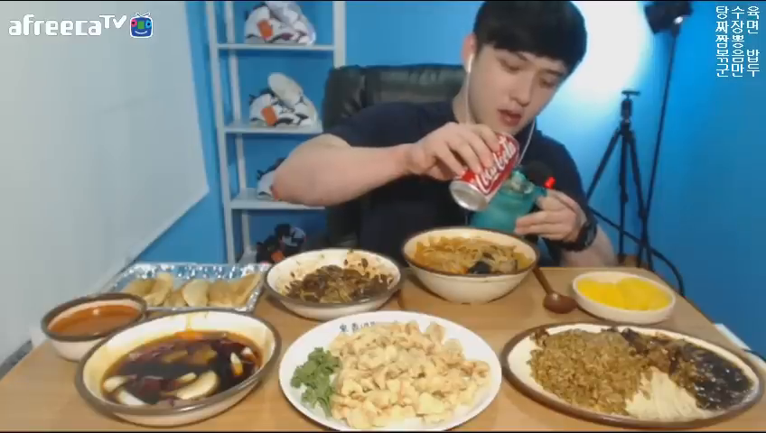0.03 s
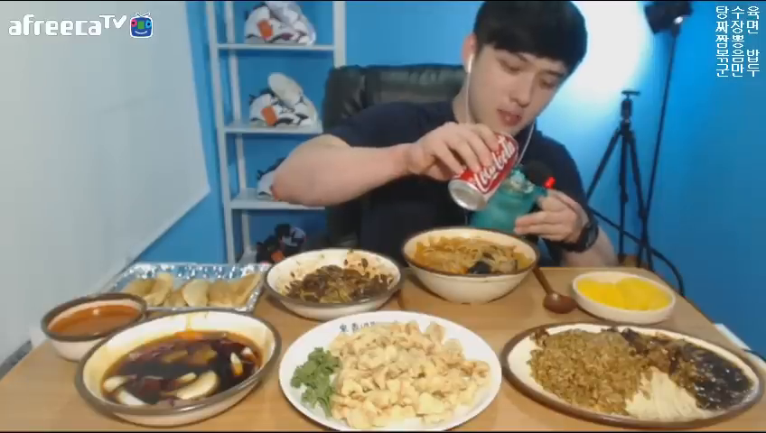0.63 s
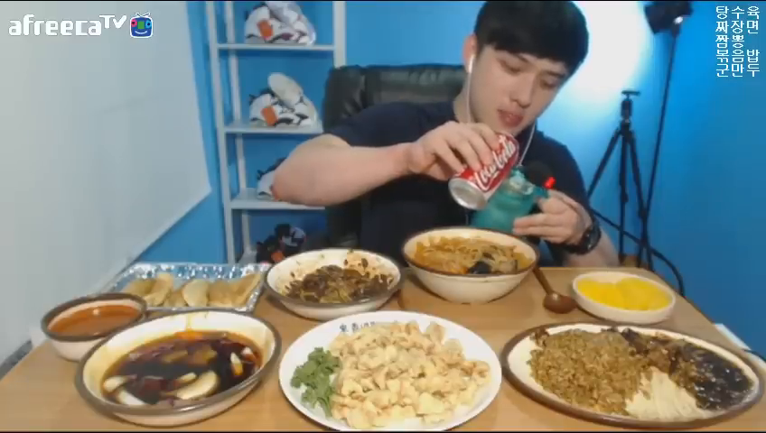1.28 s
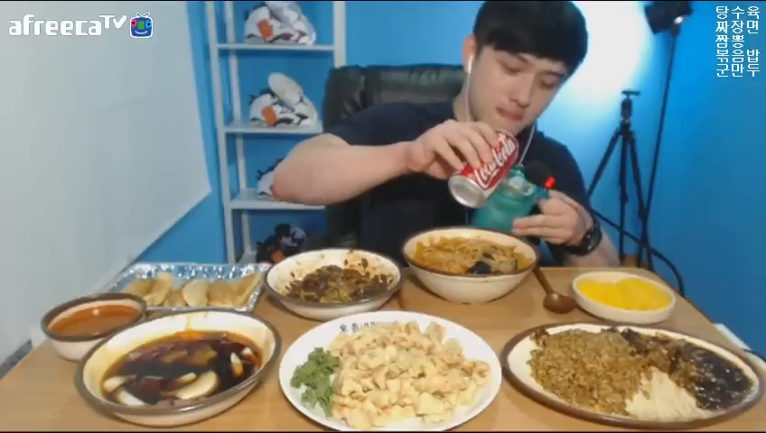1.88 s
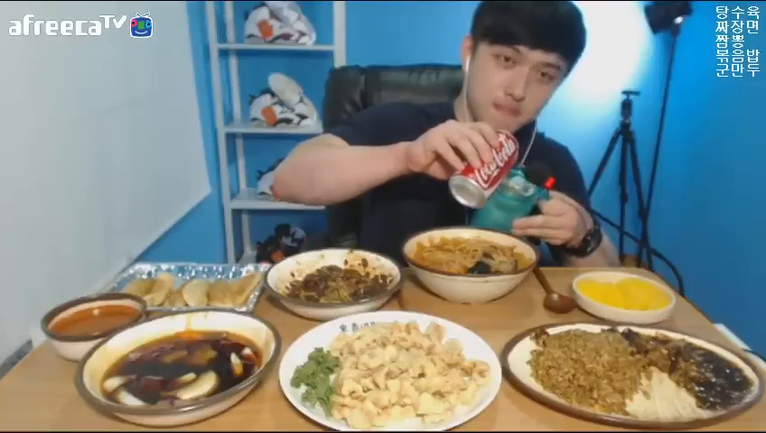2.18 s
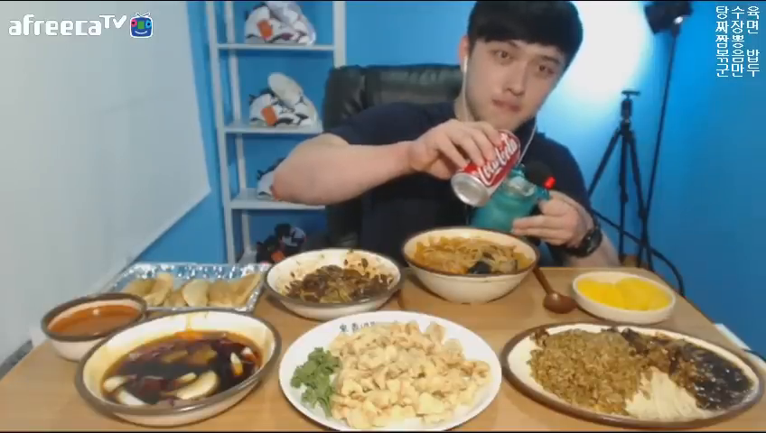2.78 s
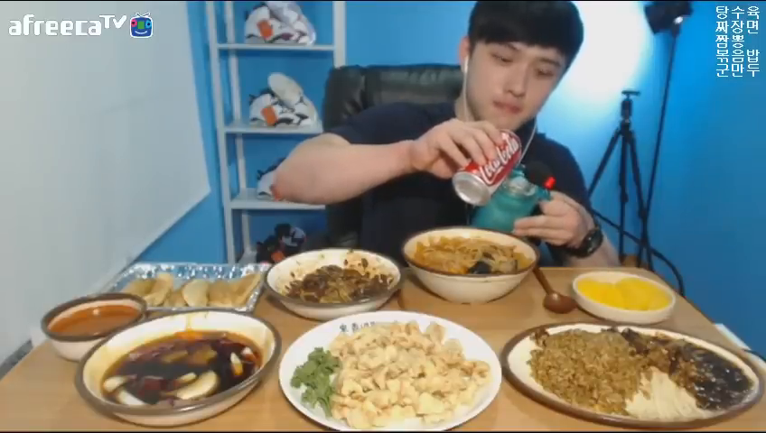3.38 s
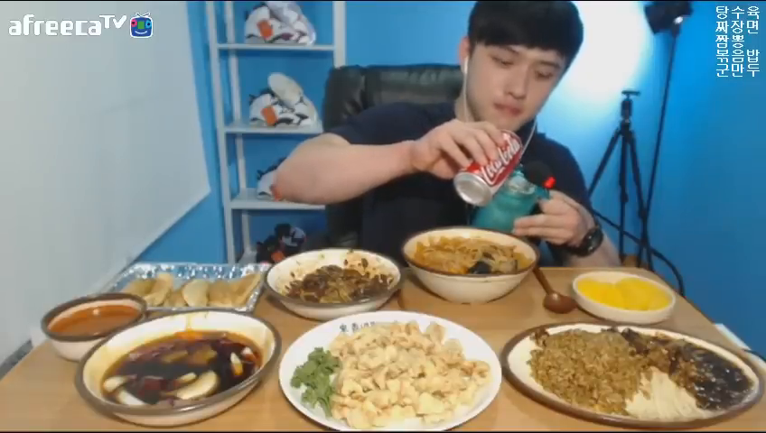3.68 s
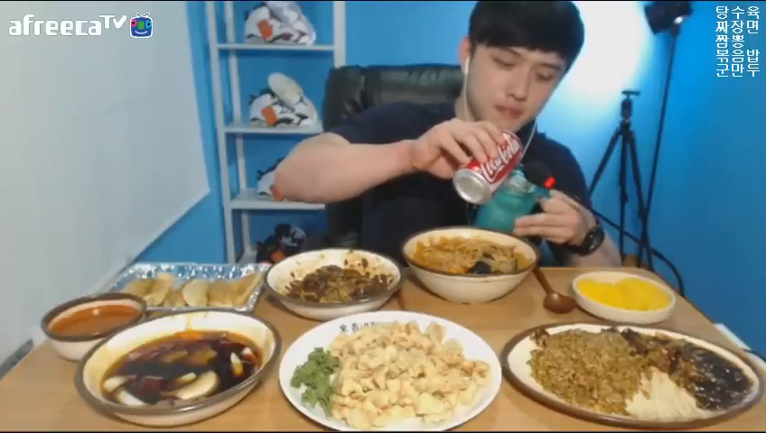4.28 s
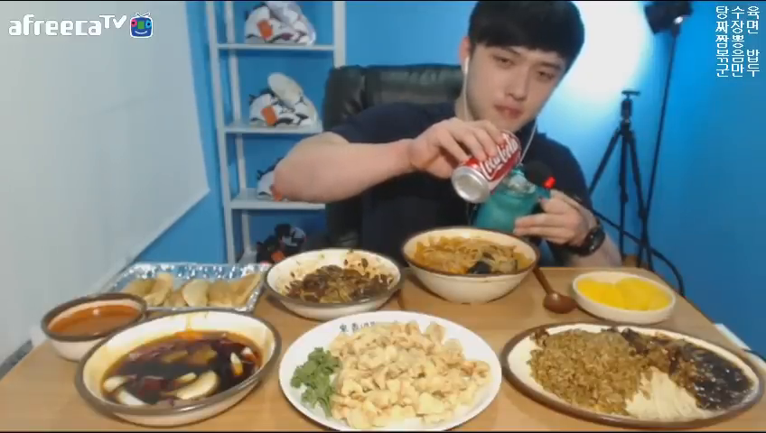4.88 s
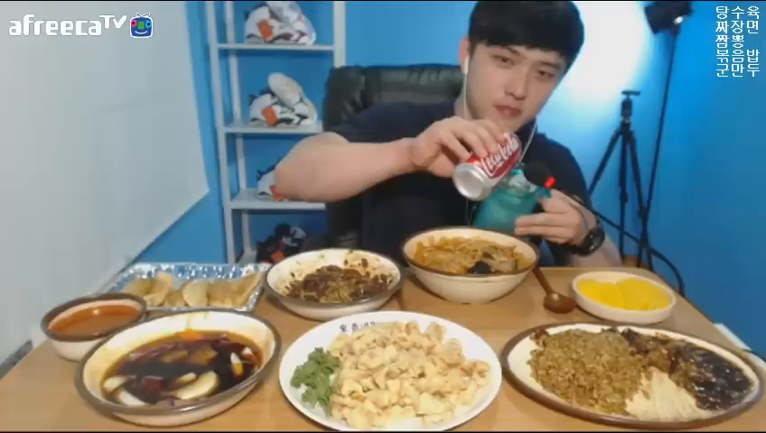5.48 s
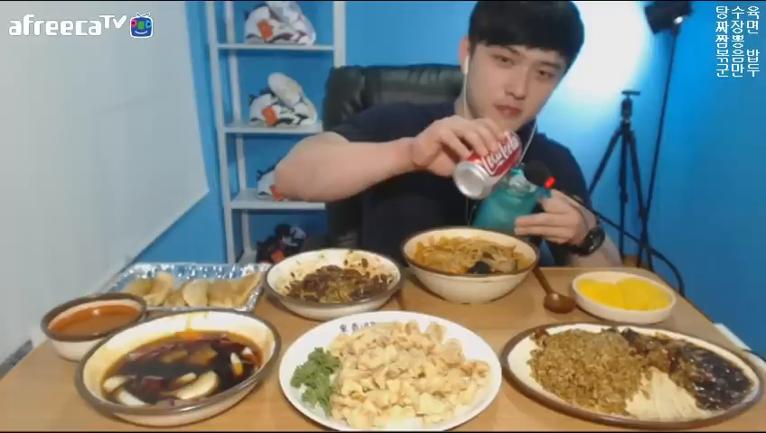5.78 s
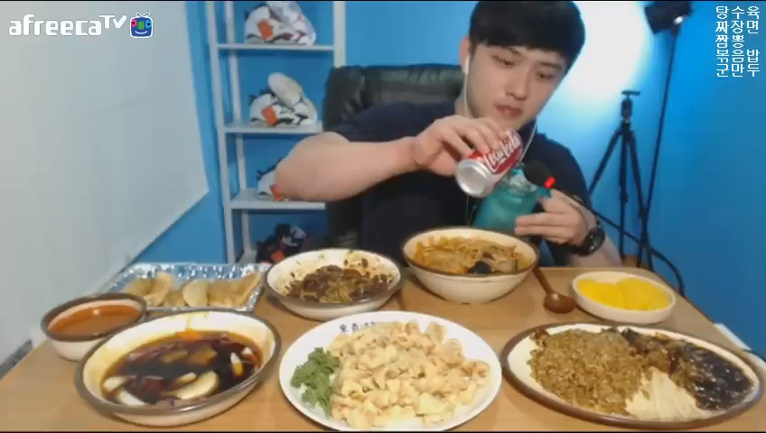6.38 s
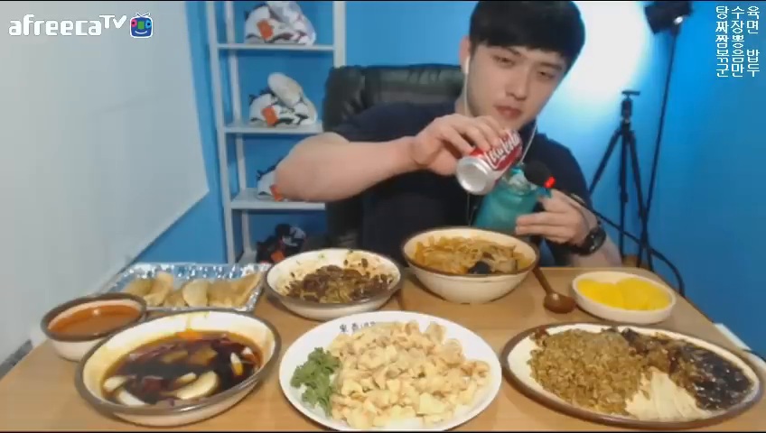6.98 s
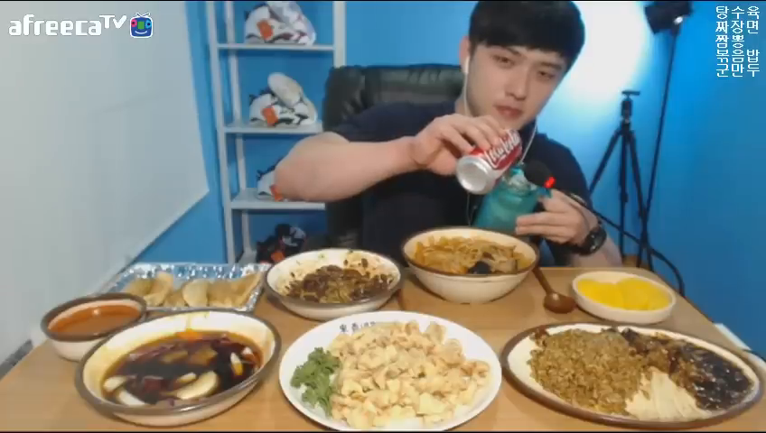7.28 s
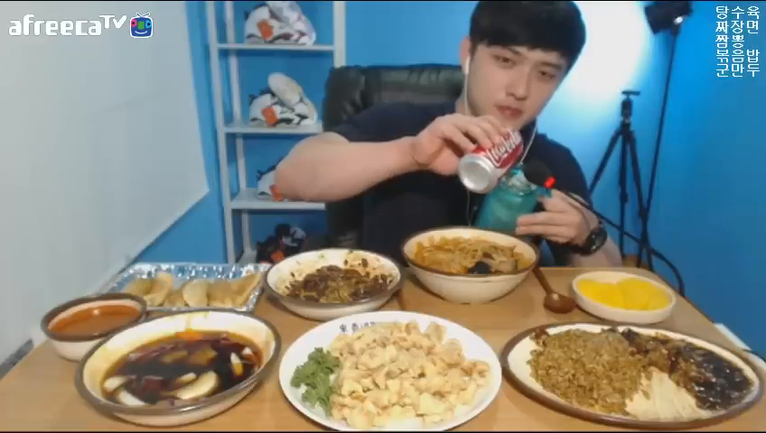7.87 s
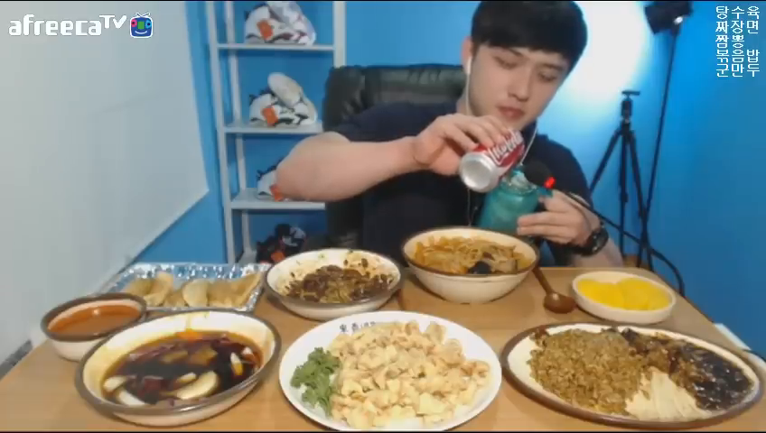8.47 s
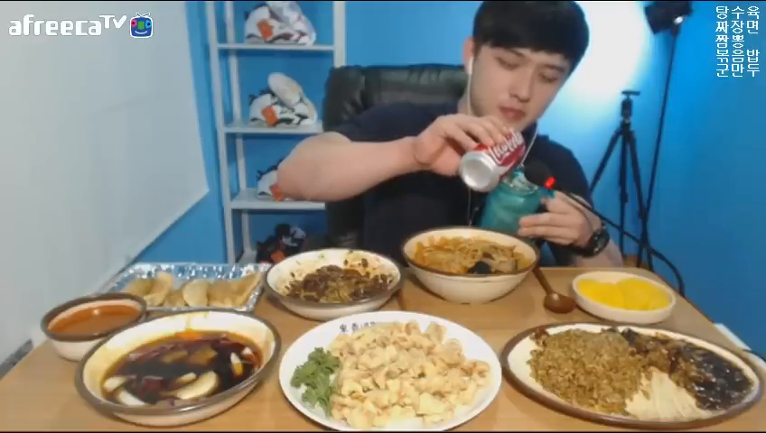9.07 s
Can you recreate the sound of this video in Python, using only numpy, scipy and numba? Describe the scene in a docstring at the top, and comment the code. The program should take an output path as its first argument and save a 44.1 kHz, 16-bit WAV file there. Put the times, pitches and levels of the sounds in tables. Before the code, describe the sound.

Soda is poured from a can into a tumbler, close to the microphone in a small room with very little echo. In the first second, drops plop in and larger bubbles snap, while a dense, bright fizz of tiny bubbles comes up at about 0.5 seconds. The fizz carries on steadily over a soft splashing stream, a little fuller around 2 to 3 seconds, whose hollow note slowly rises as the cup fills. Single bubbles pop now and then. The foam swells to its loudest near 6 seconds, with a cluster of sharp pops and a few plops, then eases slightly. From about 8 to 9 seconds the pour grows splashier and higher and breaks into a quick run of drops, gulps and bursting bubbles, with the foam still fizzing at the end. A low, steady electrical hum and faint hiss lie underneath throughout.

```python
"""Soda fizzes as it is poured from a can into a tumbler, close to a microphone in a small room.
Countless tiny bubbles pop in the foam, and the cup makes some of their pitches stand out.
The stream splashes and rings the air above the drink, whose note rises as the cup fills.
Larger bubbles burst one by one and drops plop in. Mains hum and a faint hiss lie under it all."""
import sys
import numpy as np
from scipy import signal
from scipy.fft import rfft, irfft
from scipy.io import wavfile
from numba import njit

SR = 44100
rng = np.random.default_rng(int(sys.argv[2]) if len(sys.argv) > 2 else 0)


def master(y):
    """Save y as 16-bit WAV."""
    cut = np.clip(np.atleast_2d(y).T, -1, 1)
    pcm = np.round(cut * 32767)  # scale
    wavfile.write(sys.argv[1], SR, pcm.astype(np.int16))


N = 407484
TIME = np.arange(N) / SR
BRIEF = TIME[:4096]  # the clock for one short sound

# how the foam builds, surges and settles
# (time [s], relative level of medium bubbles [dB], relative level of coarse bubbles [dB])
FOAM_LEVELS = [(0, -61, -72), (.24, -59.5, -62), (.46, -50.5, -61), (.75, -49.5, -56.5), (1.2, -49, -56),
               (1.6, -48, -52.5), (2.9, -47.5, -47.5), (4.0, -47.5, -50), (5.1, -44.5, -48),
               (5.95, -41.5, -42), (6.6, -43, -46.5), (7.2, -44, -47.5), (7.75, -45.5, -49),
               (8.6, -47, -48), (9.24, -43.5, -43)]
# tone colour of the medium bubbles (frequency [Hz], gain [dB])
MEDIUM_COLOUR = [(1500, -42), (3000, -12.5), (3900, -0.5), (5000, -0.5), (6400, -5.5), (7200, -8),
                 (8500, -24)]
# tone colour of the coarse bubbles (frequency [Hz], gain [dB])
COARSE_COLOUR = [(500, -18), (1200, -24.5), (1550, -3.5), (1800, 0.5), (2500, 1), (3400, 0.5), (4200, -8.5),
                 (6000, -36.5)]
# tone colour of the finest bubbles (frequency [Hz], gain [dB])
FINE_COLOUR = [(4000, -29.5), (6500, -3.5), (7400, -4), (8500, -3), (10000, -10), (13000, -12.5)]
# pitches the cup lifts or swallows (pitch [Hz], lift with bare walls [dB], lift under foam [dB])
CUP_RESONANCES = [(1993, 6, -2), (2495, -7, -0.5), (2790, 2, .5), (4300, 2, 0), (6430, 3.5, 1.5)]
# peaks in the fizz that glide up, settle and fade
# (start [s], length [s], first pitch [Hz], target pitch [Hz], lift [dB])
GLIDING_PEAKS = [(.36, .4, 4100, 5800, 6), (.5, .7, 6500, 6900, 3), (.75, 3.0, 4660, 5680, 7),
                 (2.3, 1.3, 1700, 1800, 3.5), (2.9, 1.7, 2740, 3030, 5), (3.6, 1.44, 2100, 2220, 5),
                 (4.1, 1.6, 5500, 6050, 3.5), (4.7, 1.06, 2600, 2780, 5.5), (5.6, 3.5, 4060, 6130, 7),
                 (6.1, 1.6, 6360, 7800, 4.5), (6.6, 2.5, 1650, 2400, 4), (6.6, 2.4, 3300, 3600, 4),
                 (7.9, 1.5, 6600, 7240, 4.5)]
# the stream churning the drink (time [s], splash level [dB], ringing air level [dB])
STREAM_LEVELS = [(0, -67.5, -72), (.45, -63.5, -65.5), (1.0, -62, -64.5), (1.6, -55.5, -61.5),
                 (2.7, -54, -60.5), (3.4, -57.5, -62.5), (4.3, -59.5, -59), (6.8, -60.5, -61),
                 (7.7, -59, -57), (8.3, -55, -52.5), (8.8, -53, -49.5), (9.24, -71, -51)]
# tone colour of the splashing (frequency [Hz], gain [dB])
SPLASH_COLOUR = [(120, -7.5), (250, -10), (400, -13), (650, -4.5), (1000, -2.5), (1400, 0.5), (2500, -6.5),
                 (5000, -39.5)]
# the column of air above the drink (time [s], height [m])
AIR_HEIGHT = [(0, 0.18), (.8, 0.15), (4.5, 0.1207), (9.24, .063)]
# larger bubbles that burst one by one
# (time [s], pitch [Hz], tone level [dB], glide [octaves], extra gain for the snap [dB])
BIG_BUBBLES = [(.092, 3930, -35, -0.051, 0), (.097, 1770, -32.5, 0.058, -18), (0.1362, 1410, -35, 0, 5),
               (.147, 384, -30.5, -.08, -25), (.145, 6800, -31, 0, 1), (0.1483, 1870, -27.5, -0.05, -6),
               (.158, 4300, -27, 0, -5), (.159, 1360, -36, .08, -15), (.1594, 2880, -19, .25, -6),
               (.172, 1650, -33, .4, -25), (0.1798, 2800, -31, 0.71, -6), (.1865, 3300, -34, -.45, 4),
               (.193, 4000, -25.5, -.05, -5), (0.1925, 1620, -33.5, .27, -8), (.257, 1916, -34.5, 0, -9),
               (.281, 1400, -41, 0, 5), (0.301, 3370, -38, -0.061, 9), (.371, 7400, -28, 0, -11),
               (0.4046, 1920, -36.5, 0, -6), (.476, 2045, -33.5, .07, 5), (.5366, 6440, -25.5, 0, -2),
               (0.5648, 7260, -26, -.12, -3), (.567, 2260, -28, -.4, -4), (.6067, 3240, -16, -.12, -10.5),
               (.6881, 4260, -23, -0.046, -6), (1.4644, 6223, -29, 0, -4), (3.376, 6600, -28, 0, -5),
               (4.197, 5600, -22, 0, -3), (5.19, 2080, -31, 0, -10), (5.8246, 1400, -29, 0, 6),
               (5.923, 1808, -32, 0, -14), (6.108, 1800, -24, -0.14, -4), (6.1104, 2580, -16.5, .15, -7),
               (6.251, 4995, -21.5, -.2, 0), (6.272, 9200, -27, .17, -1), (6.274, 6524, -15.5, 0, -23),
               (6.297, 6589, -24, 0, -8), (7.2588, 7192, -27, .14, -6), (7.924, 8000, -21.5, -0.14, -1.5),
               (8.2725, 6340, -30.5, -0.13, 5.5), (8.4363, 7751, -26, 0, -12), (8.48, 2993, -26.5, .2, 0),
               (8.5195, 6760, -20, 0, -9), (8.545, 1590, -23, 0.18, -4), (8.5797, 1280, -24.5, -.4, -12),
               (8.6669, 1174, -16, -0.45, -22), (8.6846, 1800, -33, 0, -2), (8.7026, 1440, -32, .1, 5)]
# tone colour of a bubble's skin snapping (frequency [Hz], gain [dB])
SNAP_COLOUR = [(150, -1), (1000, -1.5), (3000, 0), (7000, 0.5), (10000, -6), (14000, 1)]
# the loudest drops and gulps (time [s], tone level [dB])
BIG_DROPS = [(.0968, -34.5), (0.13, -36), (0.1477, -30), (.156, -38), (0.6453, -37), (0.832, -30.5),
             (0.8895, -34.5), (0.9814, -37), (6.1079, -33.5), (6.2521, -37), (6.273, -34.5),
             (6.4965, -29.5), (7.9246, -38), (7.9751, -36), (8.251, -28.5), (8.2842, -29.5),
             (8.3117, -31.5), (8.4506, -30.5), (8.48, -33), (8.5213, -36), (8.5446, -26), (8.579, -29.5),
             (8.6302, -28.5), (8.666, -28), (8.7033, -25), (8.8015, -32), (8.955, -35)]
# the stream breaks into drops as it starts and thins (start [s], end [s], rate [1/s], tone level [dB])
DRIBBLES = [(.25, .62, 12.2, -42.5), (7.95, 8.451, 7.9, -40), (8.72, 9.0, 20, -36.5)]
# tone colour of a drop tapping the drink (frequency [Hz], gain [dB])
TAP_COLOUR = [(80, -8), (280, -10), (400, -9), (650, 2), (900, 0), (2000, 4), (3200, -5.5), (4500, -19),
              (9000, -38)]
# the tones in the hum (multiple of the mains frequency, relative level [dB])
HUM_TONES = [(1, 0), (2, -21.5), (3, -35.5), (4, -36), (9, -35.5)]
# tone colour of the room and microphone noise (frequency [Hz], gain [dB])
HISS_COLOUR = [(15, 3.5), (35, 15), (70, 11.5), (110, 4.5), (200, -2), (400, -3), (1000, -18), (3000, -7.5),
               (10000, -27.5)]
# tone colour of the noise that sets left and right apart (frequency [Hz], gain [dB])
SIDE_HISS_COLOUR = [(15, 12.5), (60, 18), (130, -3), (300, -9.5), (1000, -12.5), (4000, -4.5), (10000, -9)]


def fizz():
    """Three sizes of tiny bubble pop in the foam, each flickering in loudness."""
    medium_db, coarse_db = curves(FOAM_LEVELS)
    fine_db = -50.5 + 0.48 * (medium_db + 46)  # the finest swell about half as much
    medium = unit(colour(pops(per_second=9000, spread_db=3.0), MEDIUM_COLOUR))
    medium *= undb(medium_db - 1.83 + .5 * wander(25))
    coarse = unit(colour(pops(per_second=5000, spread_db=1.5), COARSE_COLOUR))
    coarse *= undb(coarse_db - 2.0 + 0.67 * wander(22))
    fine = unit(colour(pops(per_second=7000, spread_db=4.5), FINE_COLOUR))
    fine *= undb(fine_db - 2.0 + .5 * wander(28))
    return medium + coarse + fine


def chirps(per_second, lift_db, spread_db):
    """At random moments a slightly larger bubble in the foam chirps above the fizz."""
    track = np.zeros(N)
    medium_db = curves(FOAM_LEVELS)[0]
    for when, pitch, chance, slide in rng.random((int(per_second * N / SR), 4)):
        hz = 1700 * 4.1 ** pitch
        db = medium_db[int(when * N)] + lift_db - spread_db * np.log(max(chance, .03))
        tone = ring(hz, t60=0.013 * np.sqrt(2000 / hz), glide=0.45 * (slide - .4))
        add(track, when * N / SR, undb(db) * tone)
    return track


def cup(sound):
    """On its way out of the tumbler a sound has some pitches lifted and others swallowed."""
    for hz, lift_db in cup_resonances():
        # a peak narrows as it grows, a hollow widens as it deepens
        width_hz = 390 * undb(-lift_db / 2) * (hz / 2000) ** 0.61
        sound = sound + (undb(lift_db) - 1) * resonate(sound, hz, width_hz)
    return sound


def cup_resonances():
    """Pitch and lift of each resonance: foam dulls the steady ones, the gliding ones come and go."""
    foam_covers_s, gradual_s = 4.58, .44  # when the foam climbs over the walls, and how slowly
    covered = (1 + np.tanh((TIME - foam_covers_s) / gradual_s)) / 2
    for hz, bare_db, foam_db in CUP_RESONANCES:
        yield np.full(N, float(hz)), bare_db + (foam_db - bare_db) * covered
    settle, fade_in, fade_out = .22, 0.15, 0.35  # shares of a glide's length
    for start, length, from_hz, to_hz, lift_db in GLIDING_PEAKS:
        age = np.clip((TIME - start) / length, 0, 1)
        strength = np.clip(np.minimum(age / fade_in, (1 - age) / fade_out), 0, 1)
        yield to_hz + (from_hz - to_hz) * np.exp(-age / settle), lift_db * strength


def stream():
    """The falling stream splashes and keeps the air in the cup ringing."""
    splash_db, air_db = curves(STREAM_LEVELS)
    hz, sharpness = air_column()
    width_hz = hz / sharpness
    splash = unit(colour(pops(per_second=2500, spread_db=4.5), SPLASH_COLOUR))
    air = resonate(pops(per_second=1200, spread_db=4.0), hz, width_hz)
    air = unit(resonate(air, hz, hz * 0.65) / np.sqrt(width_hz))
    return splash * undb(splash_db) + air * undb(air_db + 0.98 * wander(20))


def air_column():
    """The air above the drink rings like a pipe closed at one end: the shorter, the higher."""
    height, = curves(AIR_HEIGHT)
    sound_m_per_s, near_rim_m = 343, .065
    hz = sound_m_per_s / (4 * height)  # a quarter of a wave fits in the cup
    sharpness = 8.9 / (1 + (near_rim_m / height) ** 7.3)  # the note blurs as the drink nears the rim
    return hz, sharpness


def big_bubbles():
    """The skin of a larger bubble snaps, and the pocket of air in it rings for a moment."""
    tones, snaps = np.zeros(N), np.zeros(N)
    for s, hz, db, glide, snap_db in BIG_BUBBLES:
        t60 = 0.017 * (2000 / hz) ** 0.61  # bigger, lower bubbles ring longer
        opening = 1 - np.exp(-BRIEF * hz / 0.78)  # the tone builds up in about one cycle
        add(tones, s, undb(db) * opening * ring(hz, t60, glide))
        tear = fade(0.012) * rng.standard_normal(len(BRIEF))
        pitch = np.full(len(BRIEF), float(hz))
        # the snap is strongest around the bubble's own pitch
        snap = undb(-4.5) * tear + undb(-4.0) * resonate(tear, pitch, .8 * pitch)
        add(snaps, s, undb(db + snap_db - 1.1) * snap)
    return tones + cup(colour(snaps, SNAP_COLOUR))


def plops():
    """Each drop gives a dull tap and rings the air in the cup at its present pitch."""
    tones, taps = np.zeros(N), np.zeros(N)
    air_hz, _ = air_column()
    cup_hz, ring_cycles = CUP_RESONANCES[0][0], 19
    for s, db in BIG_DROPS + dribble():
        hz = np.interp(s, TIME, air_hz)
        overtone_db = -10.5 - 11 * np.log2(hz / air_hz[0])  # weakens as the cup fills
        overtone = undb(overtone_db) * ring(cup_hz, t60=.012)
        add(tones, s, undb(db) * (ring(hz, t60=ring_cycles / hz) + overtone))
        click = undb(10) * fade(0.00028)
        spatter = undb(-2) * fade(0.0096) * rng.standard_normal(len(BRIEF))
        # the tap stands out more as the drink nears the rim
        add(taps, s, undb(db) * hz / 1000 * (click + spatter))
    return tones + colour(taps, TAP_COLOUR)


def dribble():
    """Small drops fall at loosely even intervals; gives rows of (time [s], level [dB])."""
    drops, spread_db = [], 1.5
    for start, end, per_second, db in DRIBBLES:
        for s, (late, softness) in zip(np.arange(start, end, 1 / per_second), rng.random((64, 2))):
            drops.append((s + late / per_second, db - spread_db * (2 * softness - 1)))
    return drops


def room(x, t60, wet_db):
    """Faint, short echoes come back from the table and the walls."""
    tail = rng.standard_normal(len(BRIEF)) * fade(t60) * (BRIEF > .002)
    tail /= np.sqrt(np.sum(tail ** 2))
    return x + undb(wet_db) * signal.oaconvolve(x, tail)[:N]


def hum(mains_hz):
    """Mains electricity hums with a low tone and its overtones, wavering slightly."""
    tones = np.zeros(N)
    for multiple, db in HUM_TONES:
        cycles = round(multiple) * mains_hz * TIME + rng.random()
        tones += undb(db) * np.sqrt(2) * np.sin(2 * np.pi * cycles)
    return tones * undb(-35 + 0.39 * wander(9))


def hiss(points, level_db):
    """Steady noise from the room and the microphone."""
    return undb(level_db) * unit(colour(rng.standard_normal(N), points))


def undb(db):
    """Turn decibels into a number to multiply by."""
    return 10 ** (np.asarray(db) / 20)


def unit(x):
    """Scale a sound to an average strength (rms) of 1."""
    return x / np.sqrt(np.mean(x ** 2))


def curves(rows):
    """The columns of a table, joined by straight lines in time."""
    s, *columns = np.transpose(rows)
    return [np.interp(TIME, s, column) for column in columns]


def colour(x, points):
    """Shape a sound's lows and highs by rows of (frequency [Hz], gain [dB])."""
    hz, db = np.transpose(points)
    size = 8192
    grid_hz = np.maximum(np.arange(size // 2 + 1) * SR / size, 1)
    gain = undb(np.interp(np.log(grid_hz), np.log(hz), db))
    # build the filter so that it rings only after a sound, never before it
    cepstrum = irfft(np.log(gain))
    cepstrum[1:size // 2] *= 2
    cepstrum[size // 2 + 1:] = 0
    response = irfft(np.exp(rfft(cepstrum)))
    return signal.oaconvolve(x, response)[:len(x)]


@njit
def resonate(x, hz, width_hz):
    """Let through a band of pitches whose centre and width can move; the centre keeps its level."""
    y, band_state, low_state = np.empty(len(x)), 0., 0.
    for i in range(len(x)):
        step, damping = np.tan(np.pi * hz[i] / SR), width_hz[i] / hz[i]
        band = (band_state + step * (x[i] - low_state)) / (1 + step * (step + damping))
        band_state = 2 * band - band_state
        low_state += 2 * step * band
        y[i] = damping * band
    return y


def wander(per_second):
    """A random drift around zero, typically about 1 in size."""
    steps = rng.standard_normal(4096)
    return 1.2 * np.interp(TIME * per_second, np.arange(len(steps)), steps)


def add(track, s, sound):
    """Mix a sound into a track, starting at s seconds."""
    start = int(np.clip(s * SR, 0, N - 1))
    track[start:start + len(sound)] += sound[:N - start]


def fade(t60):
    """Die away by 60 dB in t60 seconds."""
    return np.exp(-np.log(1000) * BRIEF / t60)


def ring(hz, t60, glide=0):
    """A tone that slides by glide octaves while it dies away."""
    pitch = hz * 2 ** (glide * np.minimum(2 * BRIEF / t60, 1))
    return np.sin(2 * np.pi * np.cumsum(pitch) / SR) * fade(t60)


def pops(per_second, spread_db):
    """A dense shower of tiny pops of unequal size."""
    happens = rng.random(N) < per_second / SR
    size = undb(spread_db * np.clip(rng.standard_normal(N), -3, 3))
    return unit(happens * size * np.sign(rng.standard_normal(N)))


def scene():
    """The pour sits in the centre; a faint, delayed copy gives it a trace of width."""
    foam = cup(fizz()) + chirps(per_second=45, lift_db=1.0, spread_db=3.0)
    pour = room(foam + stream() + big_bubbles() + plops(), t60=0.042, wet_db=-13)
    mid = pour + hum(mains_hz=60) + hiss(HISS_COLOUR, level_db=-55.5)
    delayed = np.roll(pour, int(.011 * SR))
    side = undb(-24.5) * delayed + hiss(SIDE_HISS_COLOUR, level_db=-62.5)
    return np.array([mid + side, mid - side])


def record(dry):
    """The microphone's input cuts the highest treble and sits slightly off zero."""
    top_hz, offset = 10050, .0105
    low_pass = signal.ellip(12, .2, 70, top_hz, fs=SR, output="sos")
    return signal.sosfilt(low_pass, dry) + offset


dry = scene()
out = record(dry)
master(out)
```